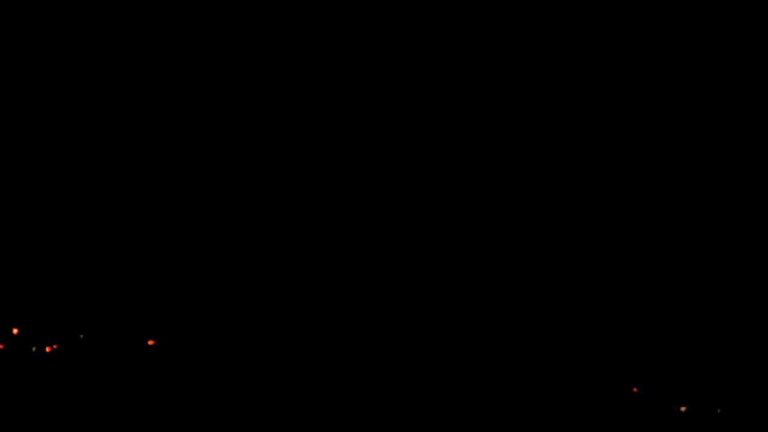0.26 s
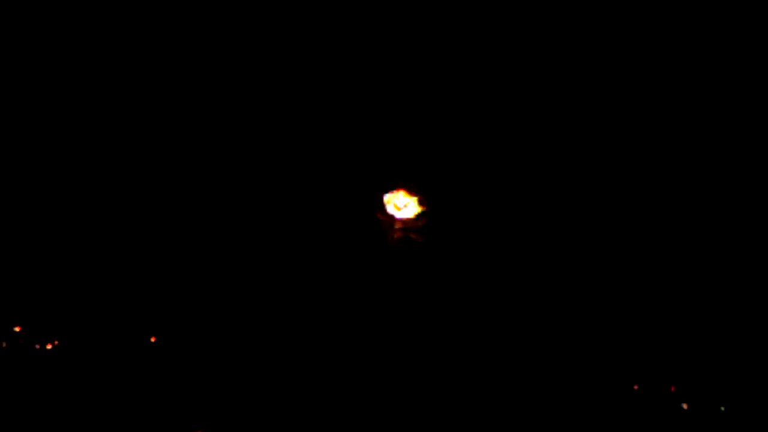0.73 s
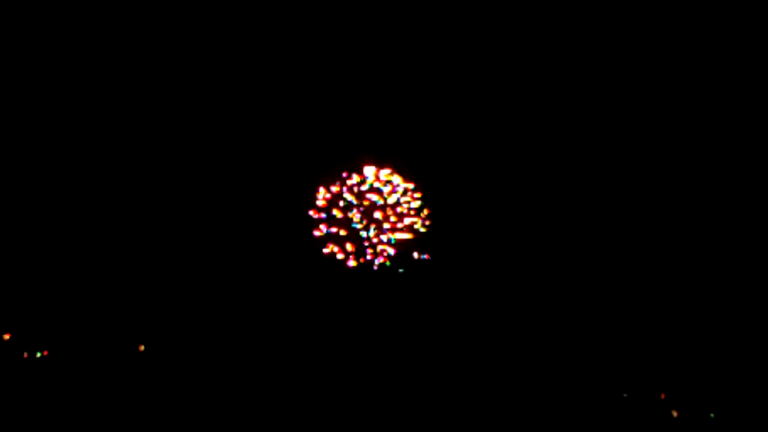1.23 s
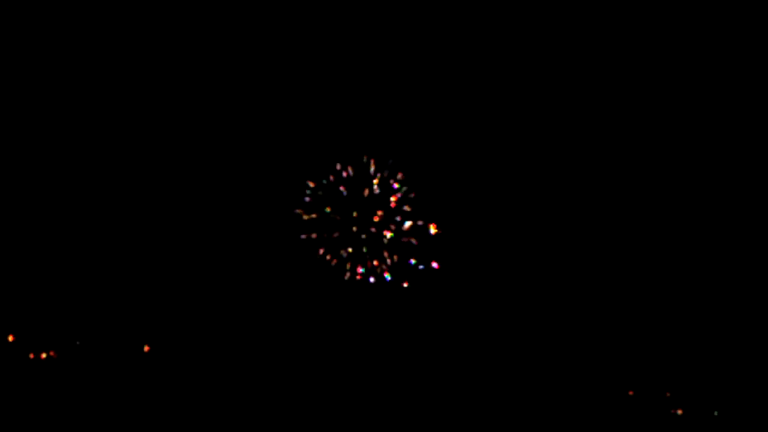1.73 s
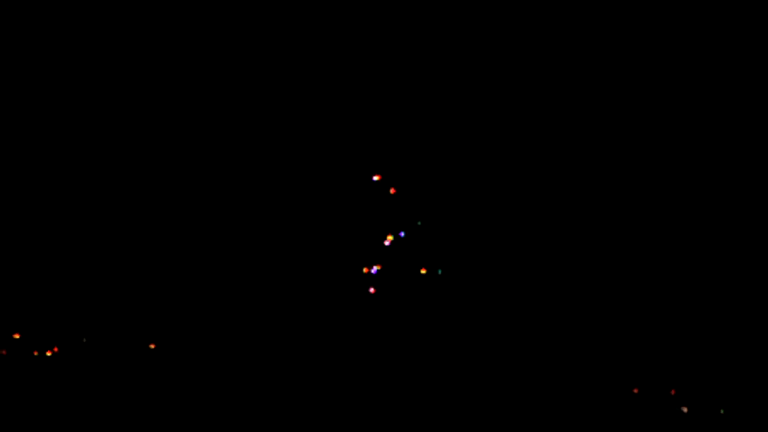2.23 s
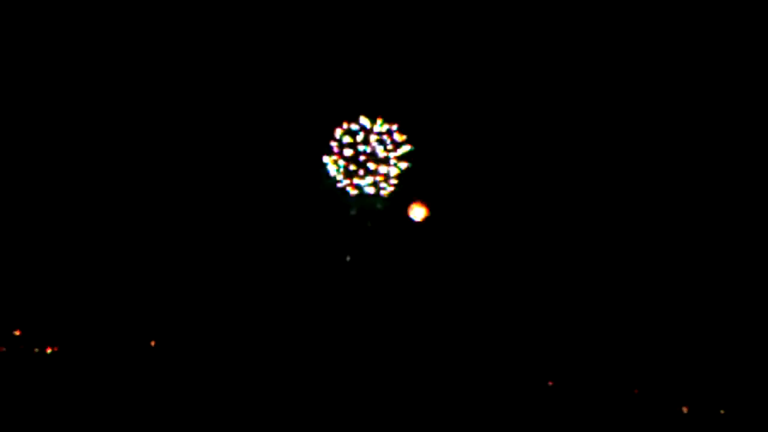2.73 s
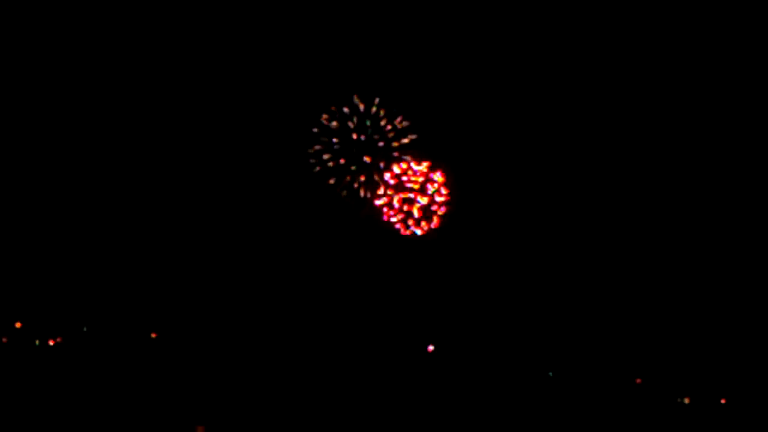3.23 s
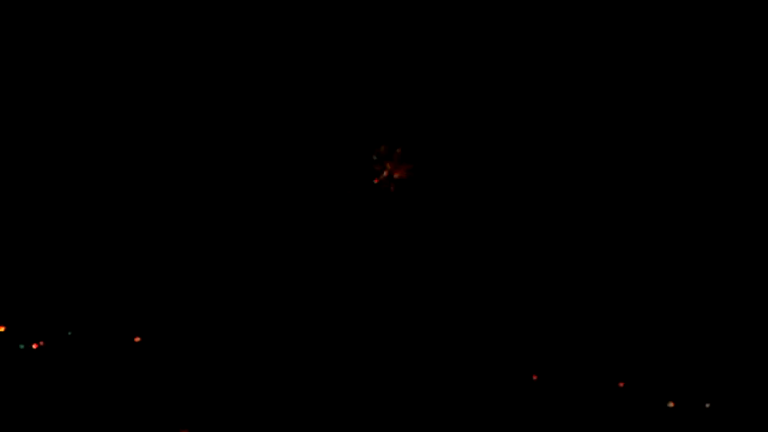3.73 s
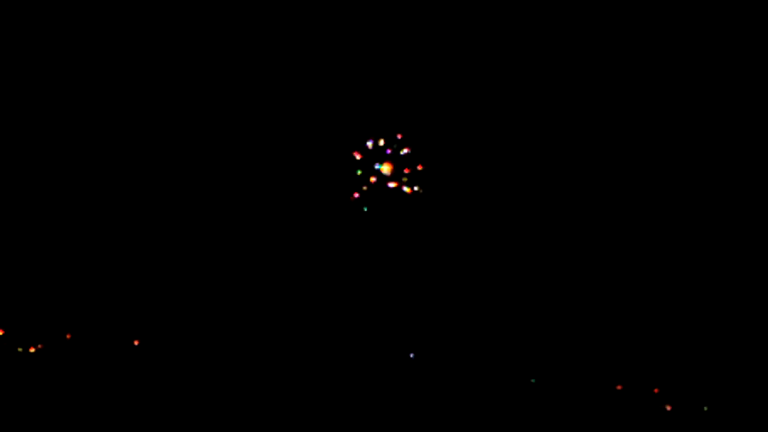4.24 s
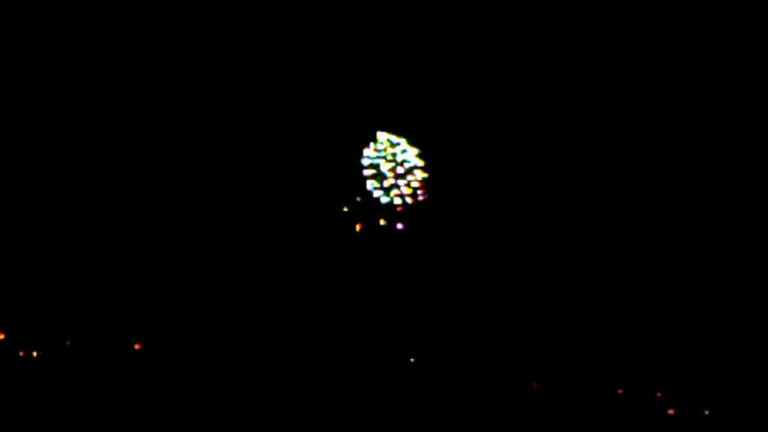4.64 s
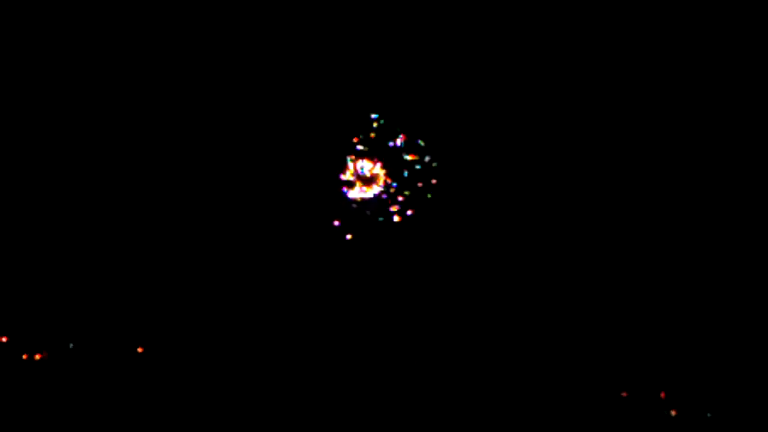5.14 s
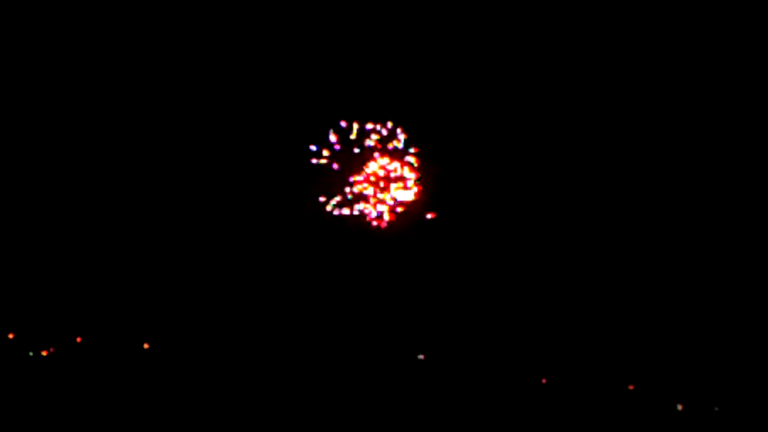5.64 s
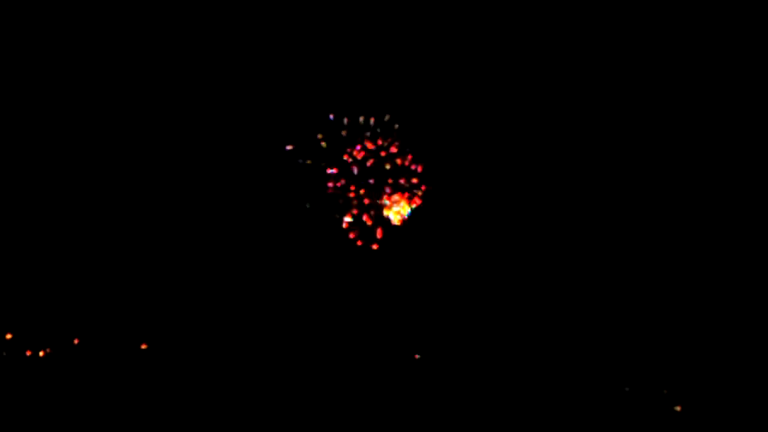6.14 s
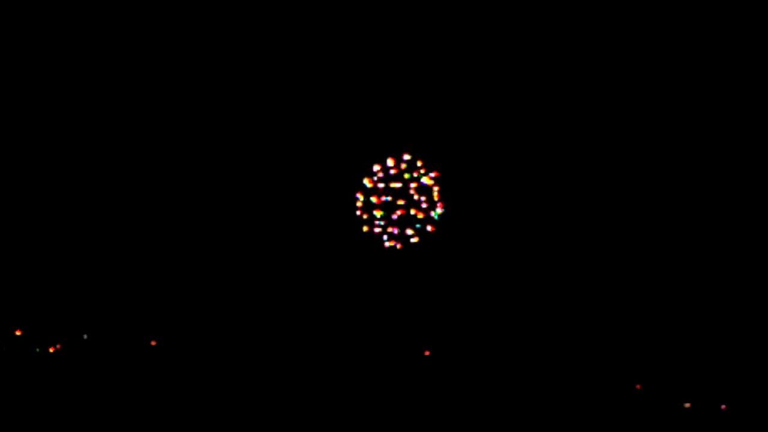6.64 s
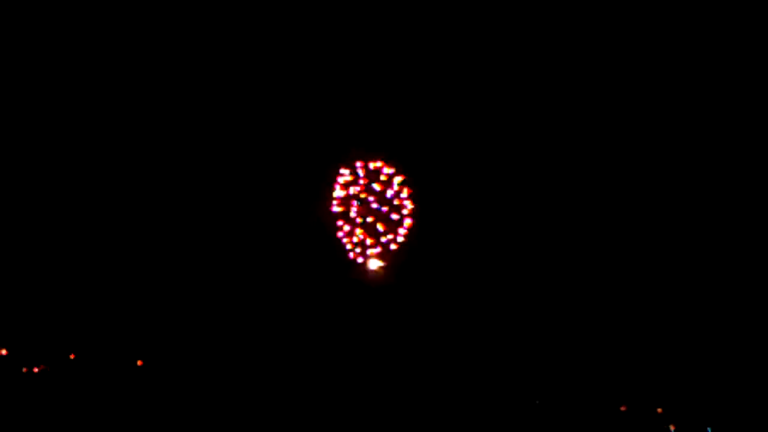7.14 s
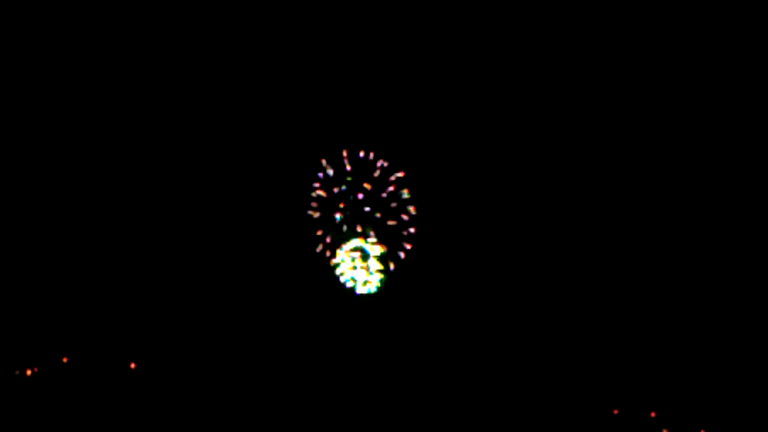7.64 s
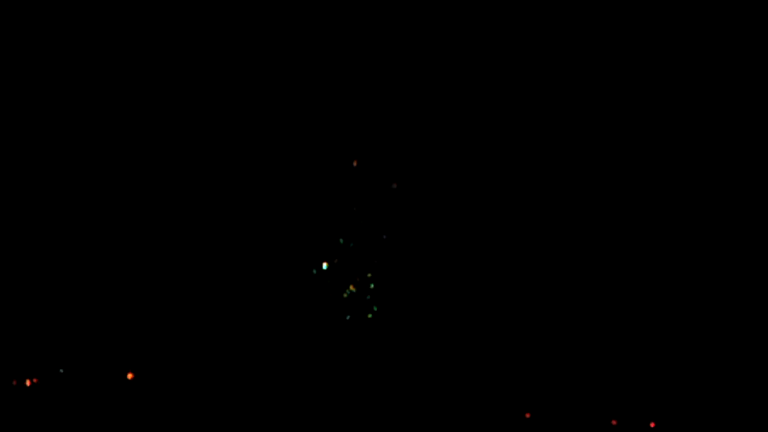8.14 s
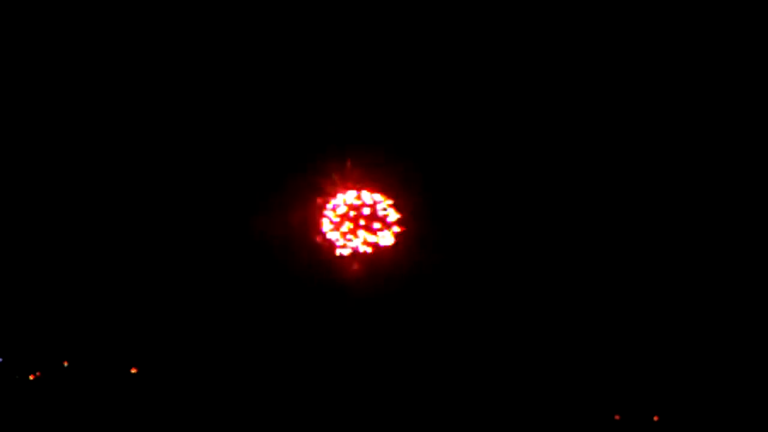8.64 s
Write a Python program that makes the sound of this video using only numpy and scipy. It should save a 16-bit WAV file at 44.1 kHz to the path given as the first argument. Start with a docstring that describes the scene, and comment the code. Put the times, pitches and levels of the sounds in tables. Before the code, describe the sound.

Hollow bangs from distant aerial fireworks arrive singly and in small clusters, each with a short ring off close walls and a long rumble across open land. The hardest bang, about midway, distorts the microphone, and another strong one lands near the end. Between them, from a spot beside a building, there is only quiet night air, soft hiss, a faint far-off rush and a few tiny ticks.

```python
"""Hollow bangs of far-off fireworks roll over open country at night, heard from beside a building.
Each shell arrives as a short N-shaped pressure wave that rings between nearby walls, returns from
farther buildings and rumbles away over the land. The loudest bangs overload the microphone.
Underneath lie night air, soft hiss, a thin whine, low bumps, a distant rush and a few faint ticks."""
import sys
import numpy as np
from scipy import signal
from scipy.fft import rfft, irfft, next_fast_len
from scipy.io import wavfile

SR = 44100
rng = np.random.default_rng(int(sys.argv[2]) if len(sys.argv) > 2 else 0)


def bounce(signal):
    """Save signal as a 16-bit WAV file at the path given by the first command-line argument."""
    frames = np.transpose(np.atleast_2d(signal))
    limited = np.clip(frames, -1, 1)
    pcm = np.round(limited * 32767).astype(np.int16)
    wavfile.write(sys.argv[1], SR, pcm)


N = 391608


def amp(db):
    """Decibels to gain."""
    return 10 ** (np.asarray(db) / 20)


def curve_at(points, hz):
    """Reads a curve of (Hz, value) points on a log-frequency axis."""
    f, value = np.transpose(points)
    return np.interp(np.log(hz + 1), np.log(f + 1), value)


def add(mix, s, sound):
    """Mixes a sound in at s seconds, keeping the part that falls inside."""
    at = round(s * SR)
    sound, part = sound[max(-at, 0):], mix[max(at, 0):]
    part[:len(sound)] += sound[:len(part)]


def lowpass(x, hz):
    """Gentle loss of treble."""
    return signal.sosfilt(signal.butter(2, min(hz, SR / 3), fs=SR, output="sos"), x)


def noise(gain_at, size):
    """Noise of rms 1, coloured by a function of frequency."""
    spectrum = rfft(rng.standard_normal(size)) * gain_at(np.fft.rfftfreq(size, 1 / SR))
    x = irfft(spectrum, size)
    return x / np.sqrt(np.mean(x ** 2) + 1e-20)


def band(hz, width, size):
    """Noise of rms 1 in one band."""
    return noise(lambda f: 1 / (1 + (2 * (f - hz) / width) ** 4), size)


def equaliser(points, size=4096):
    """Minimum-phase impulse response of a curve of (Hz, dB) points."""
    log_gain = np.log(amp(curve_at(points, abs(np.fft.fftfreq(size, 1 / SR)))))
    return np.fft.ifft(np.exp(np.conj(signal.hilbert(log_gain)))).real


def air_and_whine(air_db=-53):
    """Still night air, microphone hiss and a thin, wavering electronic whine."""
    # Colour of air and hiss. Each row: frequency in Hz, relative level in dB.
    air_colour = [(20, -0.5), (50, -15), (110, -6.5), (250, -7), (550, -7.5), (1000, -12.5), (1700, -20),
                  (3000, -23.5), (6000, -26.5), (9000, -26), (14000, -26.5)]
    # Tones of the whine. Each row: frequency in Hz, level in dB.
    tones = [(8554, -77), (8619, -74), (8689, -73.5), (8753, -83)]
    t = np.arange(N) / SR
    air = amp(air_db) * noise(lambda f: amp(curve_at(air_colour, f)), N)
    waver = 1.4 * noise(lambda f: 1 / (1 + (f / 4) ** 2), N)  # slow phase drift in radians
    whine = sum(amp(db) * np.sin(2 * np.pi * (hz * t + rng.random()) + waver) for hz, db in tones)
    return air + whine


def low_bumps(count=160, gap_s=0.11, level_db=-51.5, width_s=0.0049):
    """Soft, unevenly spaced pulses make a faint flutter in the deep bass."""
    gap_spread, level_spread = rng.standard_normal((count, 2)).T
    times = np.cumsum(gap_s * np.exp(0.14 * gap_spread))
    u = np.arange(-SR // 25, SR // 25) / SR / width_s
    bump = (1 - u ** 2) * np.exp(-u ** 2 / 2)
    out = np.zeros(N)
    for s, db in zip(times, level_db + 2.0 * level_spread):
        add(out, s, amp(db) * bump)
    return out


def distant_rush():
    """Narrow bands of far-off noise, each swelling and fading in one smooth bell."""
    # Each row: crest time in seconds, crest level in dB, half length in seconds, centre and width in Hz.
    swells = [(5.3, -54, 0.83, 1322, 270), (5.795, -69.5, 2.45, 3000, 695), (8.9, -52, 1.07, 1320, 278)]
    t = np.arange(N) / SR
    out = np.zeros(N)
    for s, db, half, hz, width in swells:
        bell = np.exp(-((t - s) / half) ** 2 / 2)
        out += amp(db) * bell * band(hz, width, next_fast_len(N))[:N]
    return out


def thud_and_ticks(size=8192):
    """A dull thud, then faint dry ticks and sizzles, each a puff of noise in one band."""
    # Each row: start in seconds, level in dB, centre and width in Hz, decay in seconds.
    puffs = [(.052, -32, 293, 310, 0.02), (2.558, -48, 5000, 8000, 0.0014), (3.302, -49, 1320, 300, 0.0053),
             (4.193, -44.5, 2470, 1510, 0.015), (4.278, -52, 3170, 2970, 0.011),
             (7.754, -44.5, 3860, 1090, 0.0018), (8.015, -56, 3180, 1200, 0.016),
             (8.07, -51, 2600, 1900, 0.0031)]
    out, t = np.zeros(N), np.arange(size) / SR
    for s, db, hz, width, decay in puffs:
        envelope = t / decay * np.exp(1 - t / decay)
        add(out, s, amp(db) * envelope * band(hz, width, size))
    return out


def reflections(t, rise, patchy_db, smooth_s=1.6):
    """Many small dull reflections that set in gradually, in clumps at first, then ever more evenly."""
    # Colour of the reflected sound. Each row: frequency in Hz, relative level in dB.
    colour = [(40, -29), (100, -4), (160, 0), (250, 9.5), (450, 7.5), (620, 6.5), (750, 3.5), (1000, 1),
              (1350, -6), (1600, -13), (2200, -22.5), (3200, -59), (8000, -55)]
    clumps = noise(lambda f: 1 / (1 + (f / 22) ** 2), len(t)) / (1 + t / smooth_s)
    wash = noise(lambda f: amp(curve_at(colour, f)), len(t))
    return wash * amp(patchy_db * clumps) * (1 - np.exp(-t / rise))


def roll(size=2 ** 17):
    """The rumble that comes back from yard, houses, fields and hills; its mids linger longest."""
    # Decay over the land. Each row: frequency in Hz, time to fall 60 dB in seconds.
    decay_times = [(100, 1.74), (400, 5.6), (1200, 4.73), (2500, 2), (6000, 1.5)]
    # Diffuse returns from the near yard and a group of houses. Each row: delay, rise and time to fall
    # 60 dB in seconds, level over the roll in dB, upper edge in Hz, treble lift in dB.
    returns = [(.003, 0.00094, 0.25, 13.5, 5030, 2), (.116, 0.0061, 0.38, 4.5, 920, 12)]
    t = np.arange(size) / SR
    hz, when, spectra = signal.stft(reflections(t, rise=0.026, patchy_db=2.5), SR, nperseg=512)
    fade = amp(-60 * when / curve_at(decay_times, hz)[:, None])
    out = signal.istft(spectra * fade, SR, nperseg=512)[1][:size]
    early = t[:size // 8]
    for delay, rise, t60, db, edge_hz, treble_db in returns:
        cloud = reflections(early, rise, patchy_db=4.0) * amp(db - 60 * early / t60)
        lift = equaliser([(900, 0), (2600, treble_db)])  # short paths keep more treble
        add(out, delay, signal.fftconvolve(lowpass(cloud, edge_hz), lift))
    return out


def facade_paths(echo_db):
    """Clean paths from one shell to the listener: direct, and off each far facade and its recess."""
    # Echoes from farther buildings. Each row: delay in seconds, level in dB, upper edge in Hz,
    # extra lag of the recess in seconds, relative gain of the recess.
    facades = [(0.118, -22, 667, 0.0026, 0.91), (.134, -25, 440, 0.0024, 0.49),
               (.146, -24.5, 483, 0.00272, 0.63), (.181, -25.5, 454, 0.0027, .6),
               (0.23, -23.5, 3220, 0.0031, 0.26)]
    paths = signal.unit_impulse(SR // 3)
    for delay, db, edge_hz, lag, recess in facades:
        echo = amp(db + echo_db) * lowpass(signal.unit_impulse(512), edge_hz)
        add(paths, delay, echo)
        add(paths, delay + lag, recess * echo)
    return paths


def nearby_walls():
    """The response of the listener's corner: a few hard slaps and a short hollow ring, all darkened."""
    # Reflections from the walls. Each row: delay in milliseconds, gain.
    slaps = [(2.24, .75), (2.87, -.4), (5.34, .21), (9.28, -.22), (10.9, .22), (15.63, .29), (20.85, .38)]
    # Resonances between the walls. Each row: pitch in Hz, level in dB, time to fall 60 dB in seconds.
    resonances = [(200.5, -5, 0.25), (223.7, 12, 0.11), (276, 16, 0.15), (408, 17.5, 0.099),
                  (446.3, 16, 0.17), (599.4, 8.5, 0.19), (882, 7.5, 0.23), (984, 10, 0.087),
                  (1371, 6, 0.22)]
    # Colour of air, ground and microphone on every bang. Each row: frequency in Hz, gain in dB.
    colour = [(40, -16), (110, -2), (200, 1.5), (450, -7), (650, 0), (1000, -5), (1350, -0.5), (1600, -15),
              (2500, -24.5), (5000, -57), (12000, -88)]
    t = np.arange(SR // 4) / SR
    out = signal.unit_impulse(len(t))
    for ms, gain in slaps:
        add(out, ms / 1000, np.array([gain]))
    for hz, db, t60 in resonances:
        damping = np.log(1000) / t60
        ring = np.exp(-damping * t) * np.cos(2 * np.pi * hz * t)
        out += amp(db) * 2 * damping / SR * ring
    return signal.fftconvolve(out, equaliser(colour))


def n_wave(length_ms):
    """A far blast: pressure jumps up, falls evenly below zero, and jumps back."""
    span = length_ms * SR / 1000
    k = np.arange(int(span) + 1)
    wave = (1 - 2 * (k + .5) / span) * np.clip(span - k, 0, 1)
    return wave - wave.mean()


def fireworks(bounce_gain=0.39, roll_db=-37.5, roll_growth=0.43):
    """Each blast has a first bounce set by its direction, then echoes; a bigger blast rolls louder."""
    # Each row: start in seconds, level in dB, N-wave length and bounce delay in milliseconds, low thump
    # in dB, facade echo trim in dB. The first shell has already burst; only its echoes are heard.
    shells = [(-.062, 1.5, 1.26, 1.1, 2, -5.5), (1.7656, 5, .95, 1.43, -1.5, 2.5),
              (2.2542, -1, 1.33, 1.67, -2, 4), (3.7817, -0.5, 0.91, 0.75, 3.5, 9),
              (3.9785, .5, 1.15, 1.74, -0.5, 1.5), (4.191, 11.5, 0.71, 2.4, 1.5, 3),
              (5.8118, -2, 1.33, 1.69, -0.5, -0.5), (6.0538, -1, 1.09, 1.67, -4, 3.5),
              (6.7139, -5.5, .85, 4.74, 9, 2.5), (7.6276, -3, 0.87, 1.46, 4, 2),
              (8.4048, 6, 0.57, 3.38, 8.5, -0.5), (8.6884, -8, 1.23, 1.93, 5, -1.5)]
    bangs, rolls = np.zeros(N), np.zeros(N)
    for s, db, length_ms, bounce_ms, thump_db, echo_db in shells:
        thump = equaliser([(113, thump_db), (240, 0)])  # bass shelf
        wave = np.convolve(n_wave(length_ms), thump)
        blast = amp(db) * signal.fftconvolve(facade_paths(echo_db), wave)
        add(bangs, s, blast)
        add(bangs, s + bounce_ms / 1000, bounce_gain * blast)
        add(rolls, s, amp(roll_db + roll_growth * db) * signal.oaconvolve(roll(), thump))
    return signal.oaconvolve(bangs, nearby_walls())[:N] + rolls


def scene():
    """One channel of fireworks over the quiet night bed."""
    return (fireworks() + thud_and_ticks() + distant_rush() + low_bumps() + air_and_whine())[None]


def record(dry):
    """The microphone clips hard on the loudest bangs; a steep filter then cuts the top treble."""
    ceiling, edge_hz = 0.689, 14200
    clipped = np.clip(dry, -ceiling, ceiling)
    treble_cut = signal.firwin(511, edge_hz, window=("kaiser", 9), fs=SR)
    return signal.oaconvolve(clipped, treble_cut[None], "same")


dry = scene()
out = record(dry)
bounce(out)
```